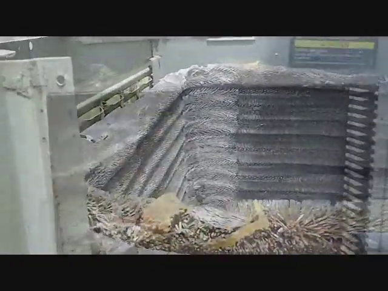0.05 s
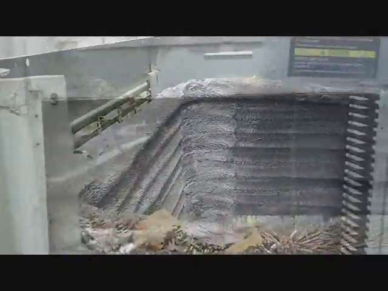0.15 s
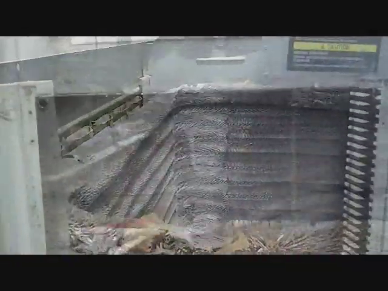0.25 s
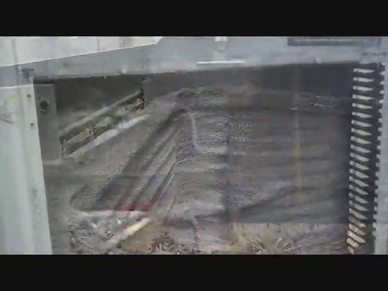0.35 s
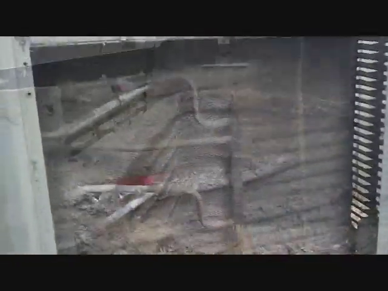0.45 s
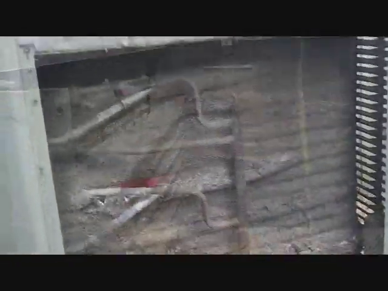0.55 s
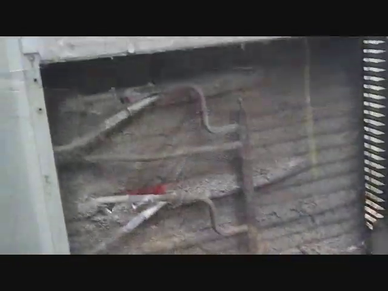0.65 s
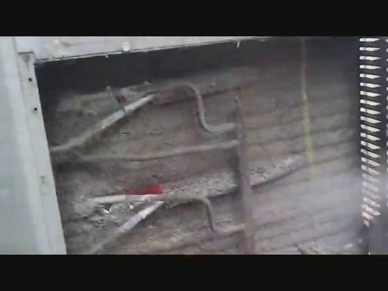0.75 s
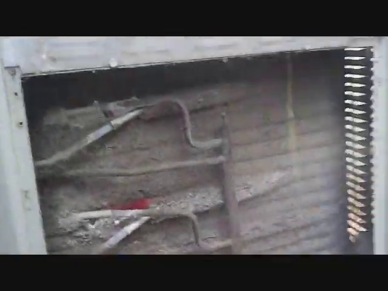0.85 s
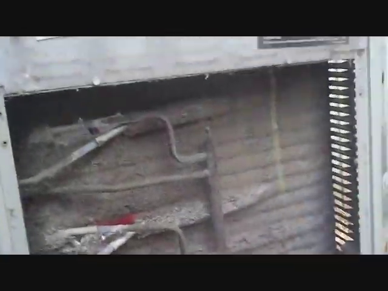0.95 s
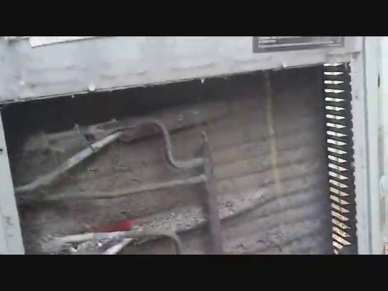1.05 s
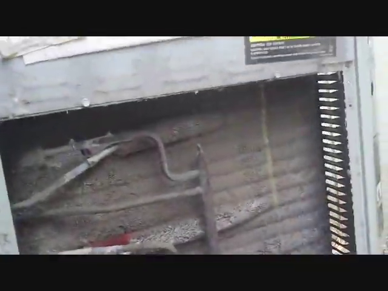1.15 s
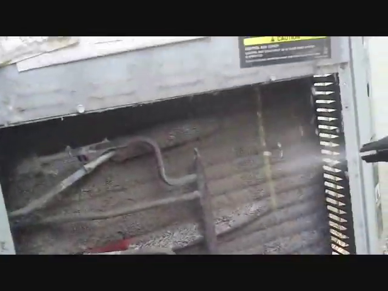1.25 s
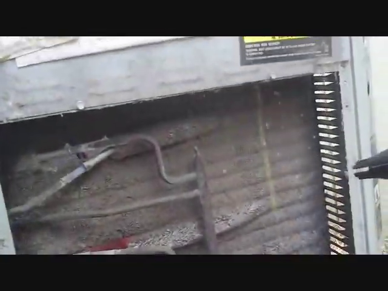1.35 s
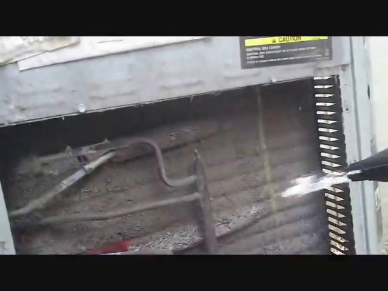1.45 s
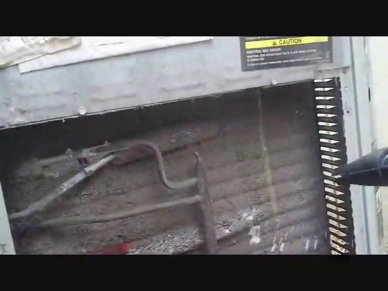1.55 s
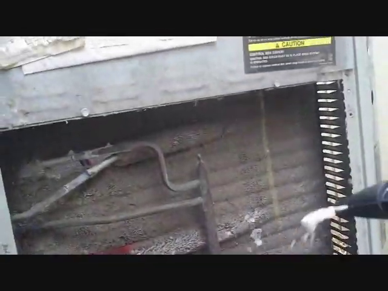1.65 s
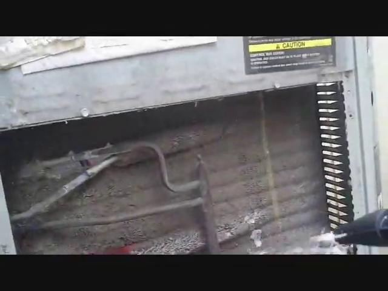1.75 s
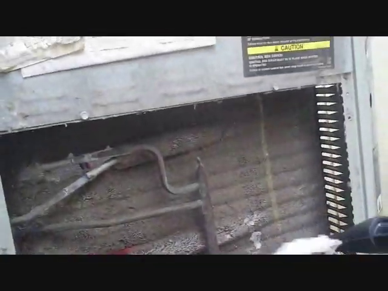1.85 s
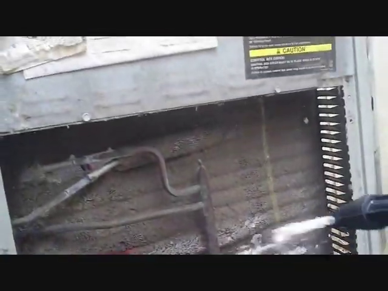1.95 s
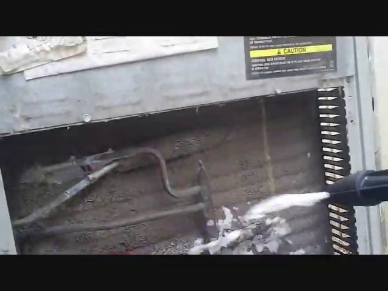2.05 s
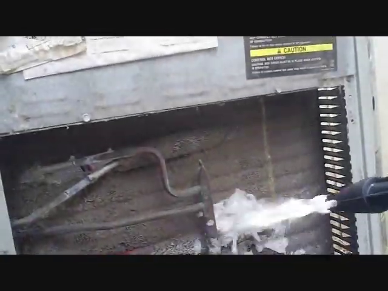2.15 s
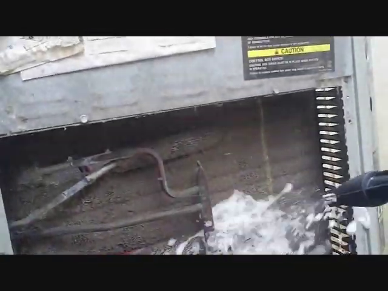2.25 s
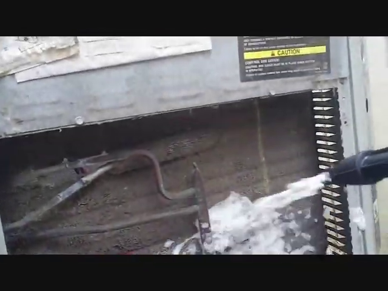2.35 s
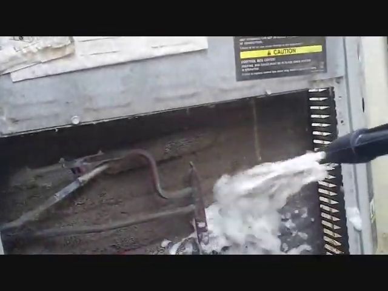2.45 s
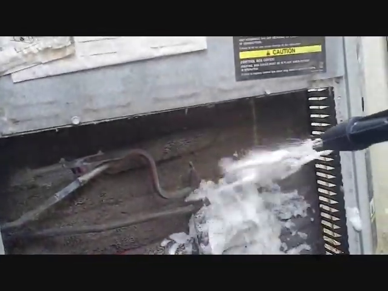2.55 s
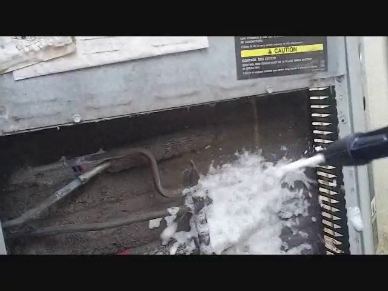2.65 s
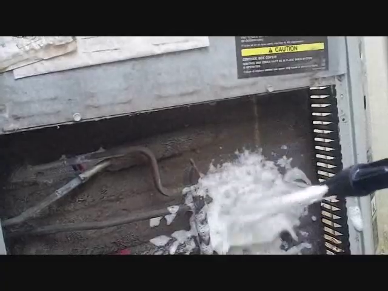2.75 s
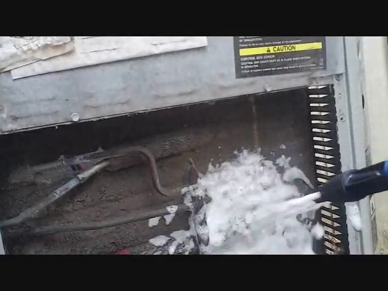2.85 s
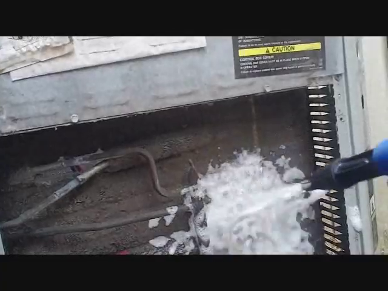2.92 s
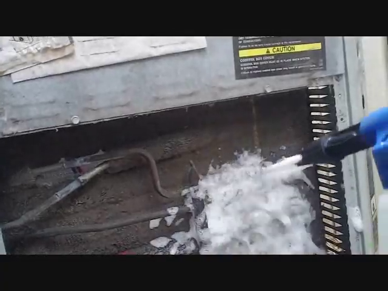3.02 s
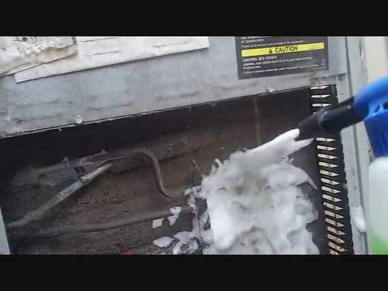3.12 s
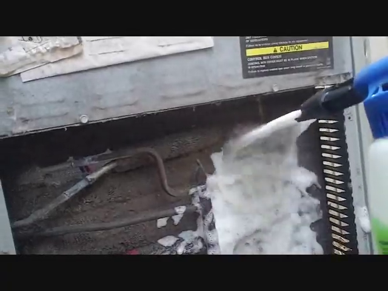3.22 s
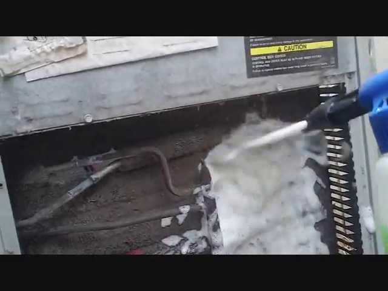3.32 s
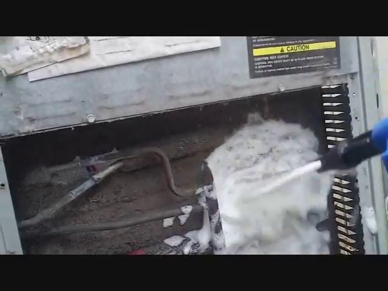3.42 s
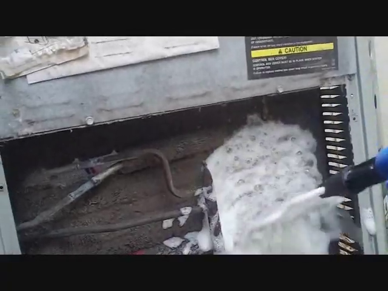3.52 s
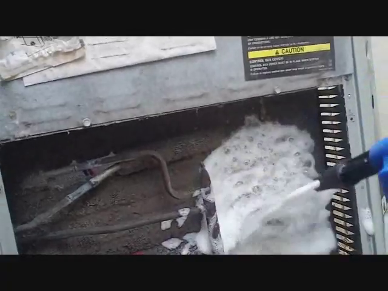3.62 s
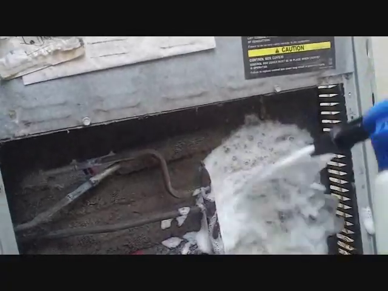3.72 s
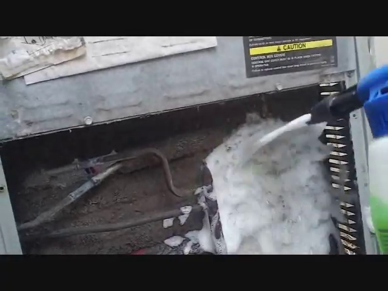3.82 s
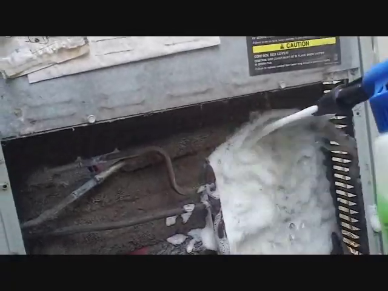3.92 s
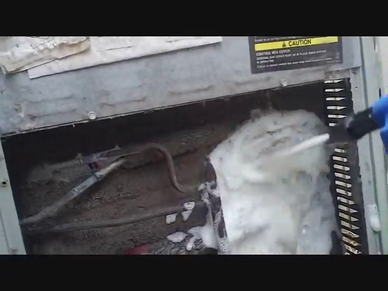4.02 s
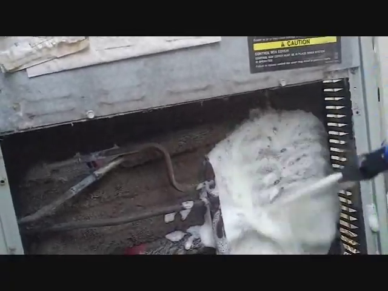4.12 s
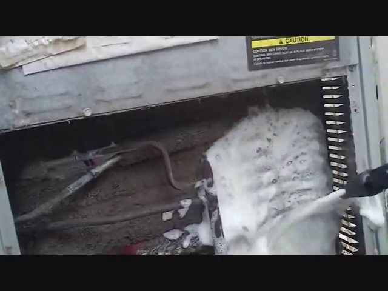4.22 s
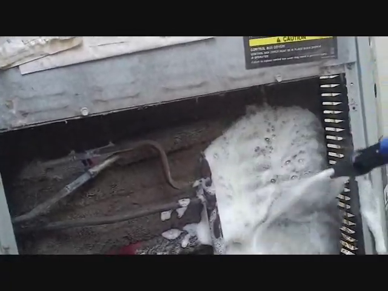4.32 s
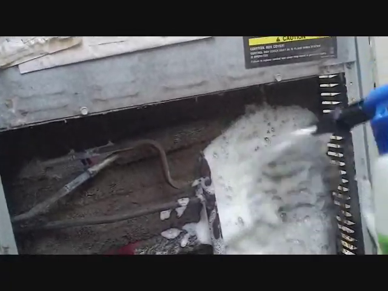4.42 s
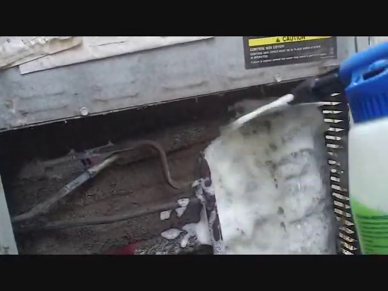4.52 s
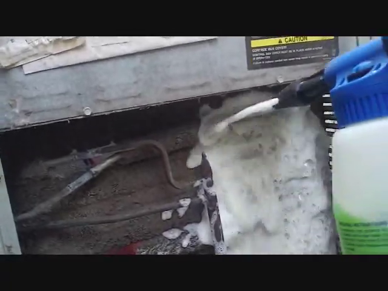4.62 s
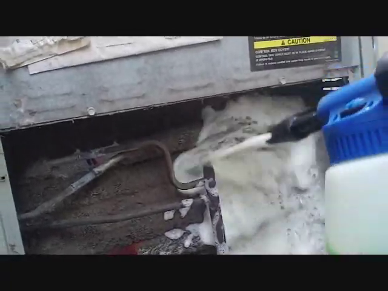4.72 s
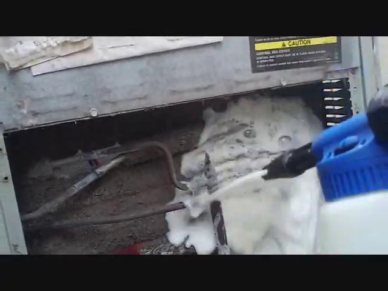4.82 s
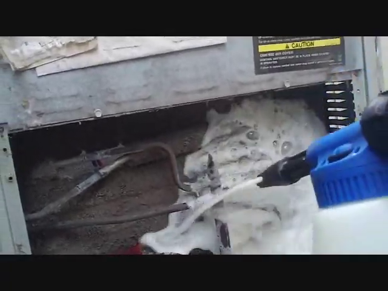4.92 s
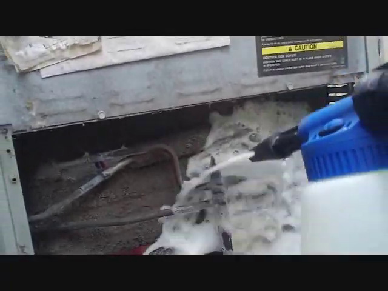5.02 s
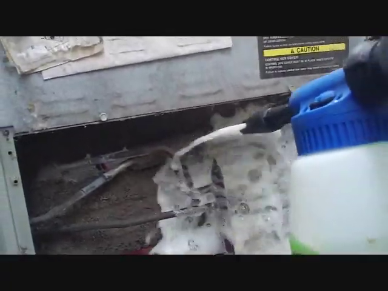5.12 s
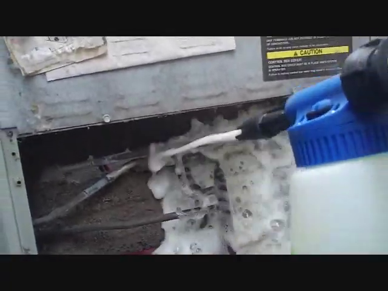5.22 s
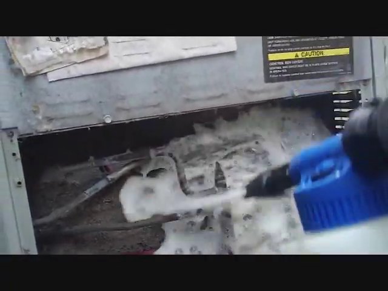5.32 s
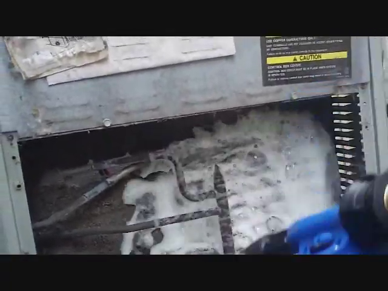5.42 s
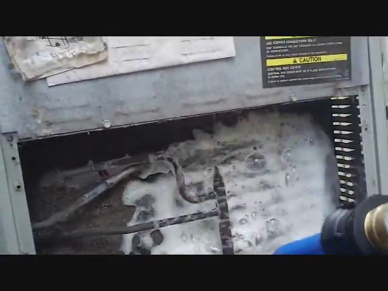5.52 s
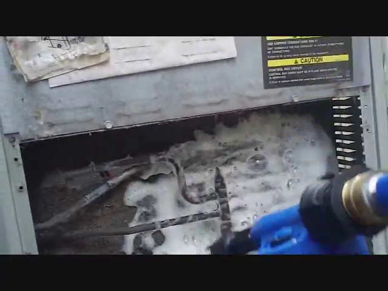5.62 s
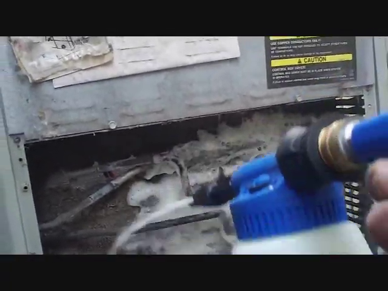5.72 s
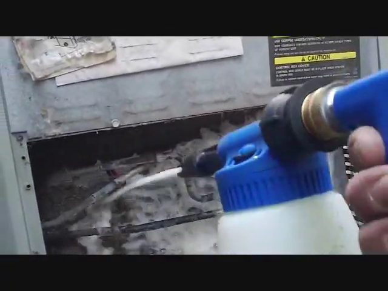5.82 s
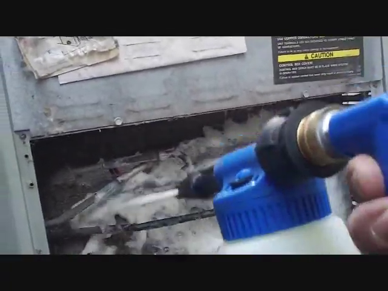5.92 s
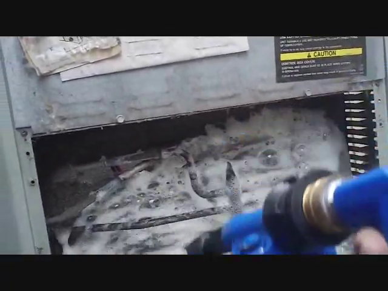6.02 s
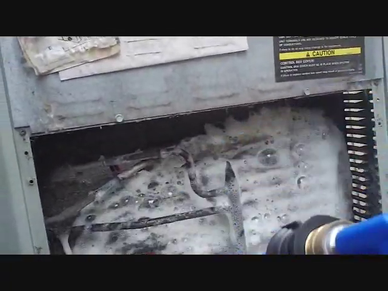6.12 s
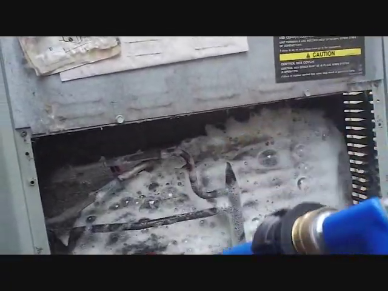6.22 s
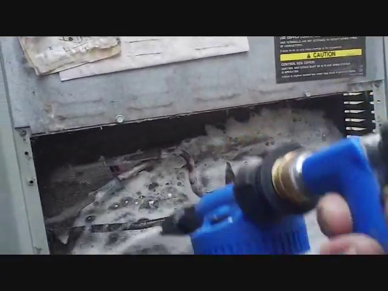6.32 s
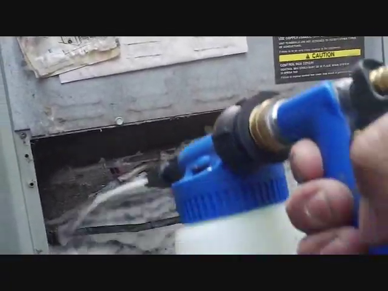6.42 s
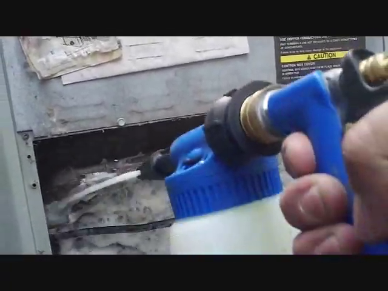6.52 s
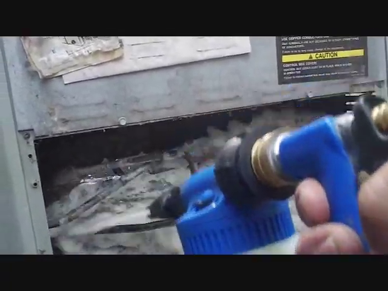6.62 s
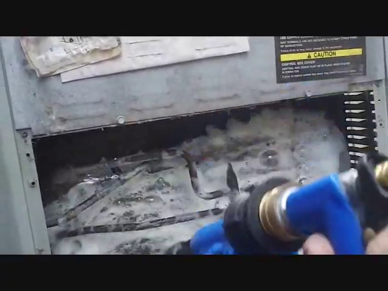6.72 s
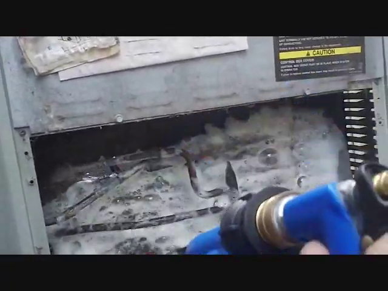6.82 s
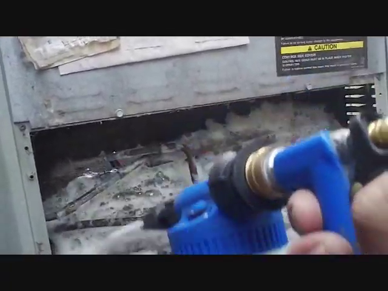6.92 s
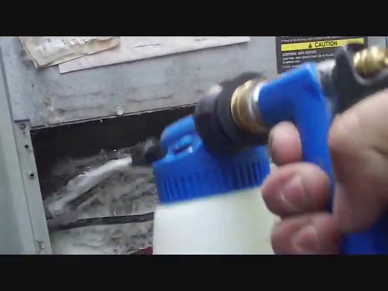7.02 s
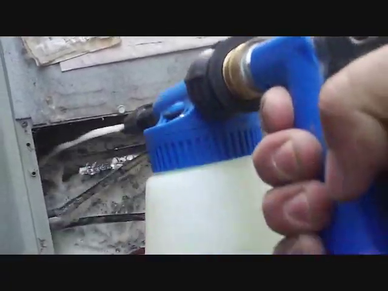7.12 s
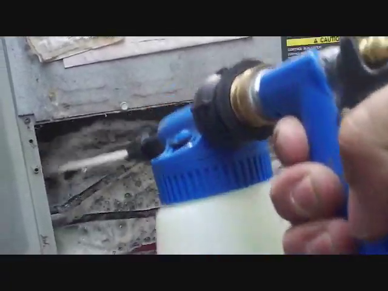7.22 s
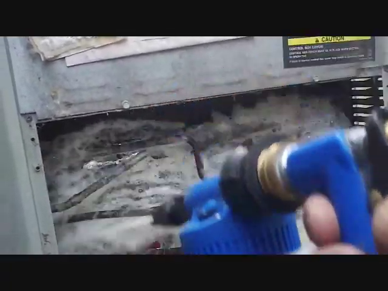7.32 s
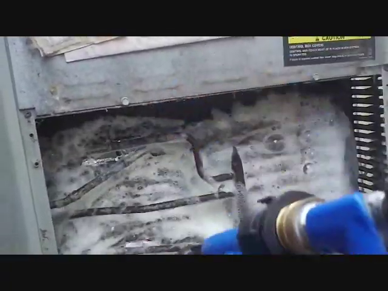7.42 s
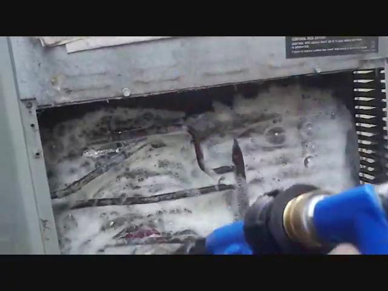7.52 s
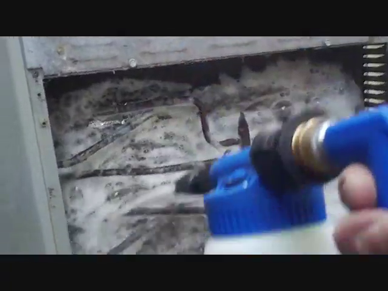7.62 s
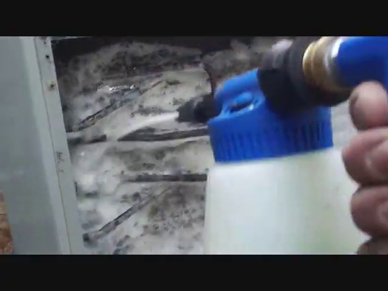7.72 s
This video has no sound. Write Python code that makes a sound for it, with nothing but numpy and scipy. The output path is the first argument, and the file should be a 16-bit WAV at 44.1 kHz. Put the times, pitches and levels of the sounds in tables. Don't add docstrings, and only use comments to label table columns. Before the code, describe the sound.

A plastic catch clicks, air hisses out in two bursts, wet sputtering coughs follow, then a foamy spray hiss settles, outdoors.

```python
import sys
import numpy as np
from scipy import signal
from scipy.fft import rfft, irfft
from scipy.io import wavfile

SR = 44100
rng = np.random.default_rng(int(sys.argv[2]) if len(sys.argv) > 2 else 0)


def volts_from_decibels(level):
    exponent = np.asarray(level, float) / 20
    return 10 ** exponent


def transcribe(u):
    v = np.clip(np.atleast_2d(u).T, -1, 1)
    q = np.round(v * 32767).astype(np.int16)
    wavfile.write(sys.argv[1], SR, q)


N = 342216
TIME_S = np.arange(N) / SR
BINS_HZ = np.arange(N // 2 + 1) * SR / N + 1


def rms_one(x):
    return x / np.sqrt(np.mean(x ** 2) + 1e-20)


def in_time(rows, outside=None):
    s, *columns = np.transpose(rows)
    return [np.interp(TIME_S, s, c, outside, outside) for c in columns]


def drift(rate):
    r = np.exp(-2 * np.pi * rate / SR)
    noise = rng.standard_normal(N + SR)
    return rms_one(signal.lfilter([1], [1, -2 * r, r * r], noise)[SR:])


def colour(x, spectrum):
    hz, db = np.transpose(spectrum)
    gain_db = np.interp(np.log(BINS_HZ), np.log(hz), db)
    return irfft(rfft(x) * volts_from_decibels(gain_db), N)


def lowpass(x, hz):
    return signal.sosfilt(signal.butter(2, hz, fs=SR, output="sos"), x)


def band(x, low_hz, high_hz):
    return rms_one(signal.sosfilt(signal.butter(3, [low_hz, high_hz], "band", fs=SR, output="sos"), x))


def resonate(x, peaks):
    for hz, width_hz, lift_db in peaks:
        peak = signal.iirpeak(hz, hz / max(width_hz, 20), fs=SR)
        x = x + (volts_from_decibels(lift_db) - 1) * signal.lfilter(*peak, x)
    return x


def ring(clicks, hz, t60):
    r, w = volts_from_decibels(-60 / (t60 * SR)), 2 * np.pi * hz / SR
    return signal.lfilter([0, np.sin(w)], [1, -2 * r * np.cos(w), r * r], clicks + 1e-18)


def turbulence(tear_db, tears_per_s):
    lumps_db = tear_db * np.clip(drift(tears_per_s), -3, 3)
    return rms_one(rng.standard_normal(N) * volts_from_decibels(lumps_db))


def pops(per_s, spread_db):
    sizes = volts_from_decibels(spread_db * np.minimum(rng.exponential(1, N), 4)) * rng.choice([-1, 1], N)
    return rms_one((rng.random(N) < per_s / SR) * sizes)


def whistle(hz, width_hz):
    phase = 2 * np.pi * np.cumsum(hz) / SR
    return drift(width_hz) * np.cos(phase) + drift(width_hz) * np.sin(phase)


def wall_echo(x, lag_s, sway, echo_db):
    lag = lag_s * SR * (1 + sway * np.clip(drift(0.802), -2, 2))
    return x + volts_from_decibels(echo_db) * np.interp(np.arange(N) - lag, np.arange(N), x)


def stream():
    # start_s, turned_share
    turning = [(4.6, 0.31), (5.0, 0.43), (5.6, 0.66)]
    # start_s, level_db, liquid_db
    flow = [(1.3, -46, 4), (1.5, -47, -8), (1.838, -43, 0), (1.978, -28.5, 1), (2.036, -33, 1),
            (2.198, -26.5, 0.7), (2.38, -22.5, 2.5), (2.41, -42, -4.5), (2.602, -28.5, 2), (2.86, -29, 0.4),
            (3.25, -29, 1), (3.38, -25, 2), (4.25, -25.5, -2.5), (4.75, -23.5, -0.7), (5.08, -29, -1.5),
            (5.4, -27, -3), (5.69, -31, -0.6), (7.76, -32.5, 2)]
    # full_flow_db, flow_swing_share, buried_loss_db, pass_gain_db
    layers = [
        (-29, 0.48, 1.5, 1),
        (-29, 0.69, 9, -2),
        (-27, 1.11, -1.3, 1.3),
        (-30.5, 0.57, -2.5, 0.3),
    ]
    liquid_share = [1, -0.47, 0.061, -0.024]
    # start_s, whistle_swell_db
    passes = [(2.85, 10), (3.27, 11), (3.93, 3), (4.12, 6), (4.52, 8), (5.1, 6), (5.42, 10), (5.95, 9),
              (6.15, 7.5), (6.7, 12), (7.28, 14)]
    # frequency_hz, level_db per Hz
    facing_colour = [(88, -52), (150, -18.5), (666, -7), (762, -7.5), (1420, 1), (1620, -3.5), (2840, -2),
                     (3650, -1.5), (5180, 8.5), (6920, -14), (7920, -3.5), (8900, 5), (15300, -10.5)]
    turned_colour = [(88, -43), (150, -7), (372, -18), (616, -4.5), (907, -11), (1060, -6), (1820, -14),
                     (4100, -20), (4880, -17), (7190, -2), (7920, -16), (9620, -9), (15300, -13.5)]
    # frequency_hz, width_hz, facing_lift_db, turned_lift_db
    peaks = np.array([(640, 49, 3.5, 3.5), (1078, 35, -2.5, 11.5), (1480, 150, 3, -13), (1920, 190, 5, -17),
                      (2726, 430, 10.5, 4.5), (4980, 200, -6, 10), (5600, 100, 0, 3.5),
                      (6690, 610, 15.5, -1)])
    # low_hz, high_hz, tear_db, tears_per_s
    parts = [(204, 1455, 0.72, 26), (1560, 4270, 1.2, 36), (3980, 8740, 2.15, 106), (7560, 15000, 1.24, 250)]
    full_flow_db, pass_s = -27, 0.14
    turn = np.clip(in_time(turning)[0], 0, 1)
    surge, out = drift(13), np.zeros(N)
    flow_db, liquid_db = in_time(flow)
    buried = np.clip((TIME_S - 4.695) / 0.13, 0, 1)
    passing = np.array([np.exp(-((TIME_S - s) / pass_s) ** 2) for s, _ in passes])
    any_pass = passing.sum(axis=0)
    levels_db = [db + share * (flow_db - full_flow_db) - lost_db * buried + pass_db * any_pass + wet * liquid_db
                 for (db, share, lost_db, pass_db), wet in zip(layers, liquid_share)]
    for level_db, (low_hz, high_hz, tear_db, tears_per_s) in zip(levels_db, parts):
        jet = turbulence(tear_db, tears_per_s)
        facing = resonate(colour(jet, facing_colour), peaks[:, [0, 1, 2]])
        turned = resonate(colour(jet, turned_colour), peaks[:, [0, 1, 3]])
        mixed = (1 - turn) * band(facing, low_hz, high_hz) + turn * band(turned, low_hz, high_hz)
        out += volts_from_decibels(level_db + 0.41 * surge + 1.1 * drift(6.8)) * mixed
    hiss_db = levels_db[2]
    swell_db = np.array(passes)[:, 1] @ passing
    out += nozzle_whistles(hiss_db, turn, any_pass, swell_db)
    out += spatter(hiss_db)
    opening = np.clip((TIME_S - 1.29) / 0.036, 0, 1)
    return wall_echo(out * opening, .0021, 0.1515, -11.5)


def nozzle_whistles(hiss_db, turn, any_pass, swell_db):
    # facing_hz, turned_hz, width_hz, facing_db, turned_db, wander_share
    tones = [(5320, 4860, 140, -15.5, -8.5, .008), (7180, 6950, 150, -16.5, -10, 0.03),
             (5720, 5900, 140, -26, -12, .03), (2785, 2680, 120, -14, -38, .01),
             (3890, 5300, 110, -14.5, -15.5, 0.025), (1298, 990, 36, -30, -17, .008)]
    between_passes_db, pass_dip_share = -5.5, .04
    out = np.zeros(N)
    for i, (facing_hz, turned_hz, width_hz, facing_db, turned_db, wander) in enumerate(tones):
        hz = (facing_hz + turn * (turned_hz - facing_hz)) * (1 + wander * drift(2.5))
        level_db = hiss_db + facing_db + turn * (turned_db - facing_db) + 1.6 * drift(6.0) + 1.8 * drift(21)
        if i == 0:
            level_db = level_db + between_passes_db + swell_db
            hz = hz * (1 - pass_dip_share * turn * any_pass)
        out += volts_from_decibels(level_db) * whistle(hz, width_hz)
    return out


def spatter(hiss_db):
    # start_s, bursts_per_s, level_db on the hiss
    bursts = [(1.4, 460, -24), (3.2, 210, -18), (4.5, 210, -17), (4.9, 420, -8), (5.2, 440, -20.5),
              (7.76, 500, -11.5)]
    per_s, level_db = in_time(bursts)
    clicks = pops(per_s, 3.6) / np.sqrt(per_s)
    dealt = rng.integers(0, 16, N)
    rings = sum((hz / 7300) ** 1.2 * ring(clicks * (dealt == k), hz, 30 / hz)
                for k, hz in enumerate(np.geomspace(2500, 7300, 16)))
    return volts_from_decibels(hiss_db + level_db + 2.5) * rms_one(rings)


def slugs():
    # start_s, length_s, level_db, ring_db
    coughs = [(1.384, 0.034, -22, 8.5), (1.43, 0.053, -27.5, 6), (1.484, 0.021, -35, 14),
              (1.536, 0.017, -22.5, -18), (1.561, 0.058, -14, -1.5), (1.623, 0.037, -26, -6),
              (1.773, .02, -24, 1), (1.819, 0.077, -12.5, 4), (1.897, 0.033, -18, 0),
              (1.921, 0.027, -13.5, -2), (1.946, .038, -21.5, 4), (2.001, 0.027, -14, 7),
              (2.026, 0.025, -16.5, 8.5), (2.126, 0.016, -13.5, 0), (2.284, 0.021, -16.5, -8),
              (2.32, 0.029, -11, 6.5), (2.354, 0.049, -13, -0.5), (2.575, .011, -13, -17),
              (2.598, .013, -15, -6), (2.633, .018, -19, -12), (2.68, 0.054, -12, 3.5),
              (2.725, 0.035, -19, 6.5), (2.894, 0.019, -15, -14), (2.919, 0.012, -12.5, 0),
              (2.932, 0.014, -11, 0), (2.942, 0.017, -21, 8.5), (3.042, 0.018, -12, -5),
              (3.055, 0.031, -16, 9), (3.089, .041, -15, 2.5), (3.204, 0.014, -19.5, -8)]
    # start_s, length_s, level_db
    spits = [(4.659, 0.0089, -23), (4.71, 0.016, -26), (4.76, 0.01, -34), (4.838, 0.016, -26),
             (4.919, 0.007, -36), (5.058, 0.011, -31), (5.286, .012, -30), (5.303, 0.039, -28),
             (5.525, 0.014, -30)]
    # frequency_hz, level_db per Hz
    slug_colour = [(88, -52), (150, -33), (666, 1.5), (808, -11), (1310, -1.5), (2040, -5.5), (2730, 1),
                   (3450, -14), (4700, 1.5), (7060, -9), (7920, -11.5), (9430, -4.5), (15300, -19.5)]
    # frequency_hz, width_hz, lift_db
    tube_peaks = [(710, 130, 2.5), (875, 14, 12.5), (1177, 280, 12.5), (1850, 100, 3), (2430, 300, 2.5),
                  (2785, 114, 9), (5060, 500, 3)]
    rows = [(s, length, db, ring_db, -6 + 0.13 * (db + 23.5) + 33 * length)
            for s, length, db, ring_db in coughs]
    rows += [(*spit, -6, 6.5) for spit in spits]
    shapes = np.zeros((3, N))
    for s, length, level_db, ring_db, treble_db in rows:
        span = slice(int(s * SR), int((s + length) * SR) + 1)
        progress = np.clip((TIME_S[span] - s) / length, 0, 1)
        shape = np.sin(np.pi * progress ** 0.77) ** 0.65
        shapes[:, span] += volts_from_decibels(level_db + np.array([[0], [ring_db], [treble_db]])) * shape
    bubbling = turbulence(0.85, 210) * volts_from_decibels(2.0 * drift(51)) + 0.64 * pops(900, 4.9)
    source = colour(bubbling, slug_colour)
    low, below_treble = lowpass(source, 2000), lowpass(source, 3600)
    torn = np.sum(shapes * [low, below_treble - low, source - below_treble], axis=0)
    cough = resonate(torn, tube_peaks) / np.std(resonate(source, tube_peaks))
    thud = volts_from_decibels(-17.5) * shapes[0] * band(source, 157, 347)
    return wall_echo(cough + thud + volts_from_decibels(-9) * gurgle(shapes[0]), 0.0026, 0.12, -5.0)


def gurgle(flow):
    clicks, dealt = pops(500, 3.8), rng.integers(0, 14, N)
    pitches = np.geomspace(620, 3000, 14)
    unit = np.std(sum(ring(clicks * (dealt == k), hz, 14 / hz) for k, hz in enumerate(pitches)))
    rings = sum(ring(flow * clicks * (dealt == k), hz, 14 / hz) for k, hz in enumerate(pitches)) / unit
    return signal.sosfilt(signal.butter(3, 230, "high", fs=SR, output="sos"), rings)


def air():
    # open_s, held_s, hiss_db, sag_db_per_s, first_flutter_peak_s after opening
    blasts = [
        (0.77, 0.19, -18.5, 13.5, 0.036),
        (1.305, 0.18, -19.5, 62, 0.0356),
    ]
    # frequency_hz, level_db per Hz
    air_colour = [(180, -66), (300, -27.5), (1050, -8.5), (1230, -3), (2230, -18.5), (2630, -20),
                  (3970, -18), (6610, -8.5), (7920, -14), (9810, -6), (15300, -14)]
    # frequency_hz, width_hz, lift_db
    air_peaks = [(1320, 105, 7), (2680, 260, 13), (1500, 83, -4), (10100, 600, 0.5)]
    # frequency_hz, width_hz, lift_db
    wetted_peaks = [(4960, 560, 11), (6040, 220, 1), (7100, 170, 7.5), (2620, 360, -5), (13000, 5000, -4)]
    open_s, shut_db_per_s, tail_db, tail_db_per_s = 0.033, 700, -25, 250
    seep_s, seep_db, seep_body_db = .09, -54, 9.5
    level_body_db, boom_db, boom_s, flutter_hz, body_lingers_s = -1, 5, .09, 30.5, 0.0099
    hiss = rms_one(resonate(colour(turbulence(2.26, 85), air_colour), air_peaks))
    out = np.zeros(N)
    for (s, held, db, sag_db, flutter_s), peaks in zip(blasts, ([], wetted_peaks)):
        since = TIME_S - s
        shut = np.maximum(since - held - np.array([[0], [body_lingers_s]]), 0)
        closing = volts_from_decibels(-shut_db_per_s * shut) + volts_from_decibels(tail_db - tail_db_per_s * shut)
        opening = np.clip(since / open_s, 0, 1) ** 1.23
        hiss_level, body_level = opening * volts_from_decibels(db - sag_db * np.clip(since, 0, held)) * closing
        seep = volts_from_decibels(seep_db) * np.clip(1 + since / seep_s, 0, 1) * (TIME_S < s + open_s)
        from_peak = since - flutter_s
        flutter = np.exp(-abs(from_peak) / boom_s) * np.cos(2 * np.pi * flutter_hz * from_peak)
        body_db = level_body_db + boom_db * flutter
        blast = resonate(hiss, peaks)
        body = lowpass(blast, 3500)
        bright_part = (hiss_level + seep) * (blast - body)
        body_part = (body_level * volts_from_decibels(body_db) + seep * volts_from_decibels(seep_body_db)) * body
        out += volts_from_decibels(5.0) * (bright_part + body_part)
    return wall_echo(out, .0024, 0.16, -7.0)


def leak():
    # start_s, level_db
    seeping = [(1.1, -67), (1.13, -58), (1.2, -56), (1.23, -55), (1.28, -61), (1.31, -46)]
    # frequency_hz, width_hz, lift_db
    seep_peaks = [(1620, 94, 30), (5100, 220, 7), (6200, 250, 5), (7200, 250, 8)]
    # start_s, length_s, pitch_hz, level_db, fade_db_per_s
    drains = [
        (1.617, .22, 1380, -37.5, 70),
        (2.38, 0.27, 1485, -35.5, 14),
    ]
    edge_db_per_s, rise_hz_per_s = 600, 350
    hz, drain = np.zeros(N), np.zeros(N)
    for s, length, start_hz, db, fade_db in drains:
        since = TIME_S - s
        on = (TIME_S > s) & (TIME_S < s + length)
        edge_db = np.minimum(edge_db_per_s * np.minimum(since, s + length - TIME_S) - 10, 0)
        hz += on * (start_hz + rise_hz_per_s * (since - .04))
        drain += on * volts_from_decibels(db + edge_db - fade_db * (since - 0.0751) * on)
    seep = volts_from_decibels(in_time(seeping, -99)[0]) * rms_one(resonate(turbulence(2.3, 40), seep_peaks))
    return seep + drain * volts_from_decibels(2.0 * drift(30)) * whistle(hz, 132)


def knocks():
    # start_s, peak_db, ring_hz, t60_s, crack_db
    hits = [
        (0.1323, -18, 640, 0.027, -0.5),
        (6.8218, -8.5, 1010, 0.01, -32),
        (6.984, -25.5, 2950, 0.039, -27),
        (7.269, -17, 3164, .02, -18),
        (7.719, -14.5, 820, 0.011, -26),
    ]
    # frequency_hz, t60_s, level_db
    catch_modes = [(1300, 0.0031, -36), (1870, 0.0051, -11), (2900, 0.0088, -13), (4240, 0.0011, -9.5),
                   (5680, 0.0057, -9), (8660, 0.0024, -23), (11500, .005, -21)]
    # after_s from first touch, signed strength
    rattle = [(0, 0.98), (.00028, 0.92), (.00062, -0.7), (.00085, -0.75), (.0012, 0.38)]
    out, crack = np.zeros(N), np.zeros(N)
    for s, peak_db, hz, t60, crack_db in hits:
        click = np.zeros(N)
        click[int(s * SR)] = 1
        out += volts_from_decibels(peak_db) * ring(click, hz, t60)
        crack += volts_from_decibels(crack_db) * click
    crack = sum(strength * np.roll(crack, int(after * SR)) for after, strength in rattle)
    out += sum(volts_from_decibels(db) * ring(crack, hz, t60) for hz, t60, db in catch_modes)
    return signal.sosfilt(signal.butter(2, [200, 13000], "band", fs=SR, output="sos"), out)


def outdoors():
    # frequency_hz, level_db per Hz
    ambient_colour = [(15, -57), (25, -32), (53, -9), (69, -9.5), (91, -4), (151, -6.5), (376, -21.5),
                      (534, -20), (1600, -27), (2460, -34), (7820, -40), (9190, -39.5), (15300, -41)]
    # start_s, level_db
    rumble_levels = [(0, -49), (.9, -51.5), (1.3, -47), (7.76, -47.5)]
    # start_s, level_db
    murmur_levels = [(0, -48), (.8, -47.5), (1.05, -53.5), (1.25, -49), (1.6, -46.5)]
    noise = colour(rng.standard_normal(N), ambient_colour)
    rumble = volts_from_decibels(in_time(rumble_levels)[0] + .5 * drift(3.7)) * band(noise, 30, 240)
    murmur = volts_from_decibels(in_time(murmur_levels)[0] + .5 * drift(2.7)) * band(noise, 178, 16000)
    return rumble + murmur


def scene():
    return np.tile(air() + leak() + slugs() + stream() + knocks() + outdoors(), (2, 1))


def roll_off(x):
    return signal.sosfilt(signal.butter(12, 16540, fs=SR, output="sos"), x)


def record(dry):
    # frequency_hz, width_hz, times_applied
    dead_spots = [
        (7880, 250, 3),
        (10965, 480, 1),
    ]
    x = np.tanh(dry / .98) * .98
    for hz, width_hz, times in dead_spots:
        for _ in range(times):
            x = signal.lfilter(*signal.iirnotch(hz, hz / width_hz, fs=SR), x)
    x = signal.sosfilt(signal.ellip(12, .5, 75, 15290, fs=SR, output="sos"), x)
    return roll_off(x)


dry = scene()
out = record(dry)
transcribe(out)
```